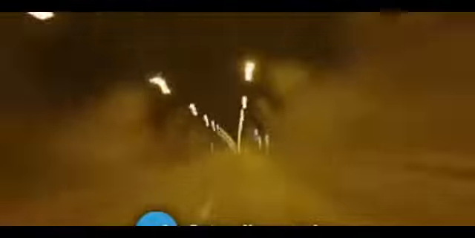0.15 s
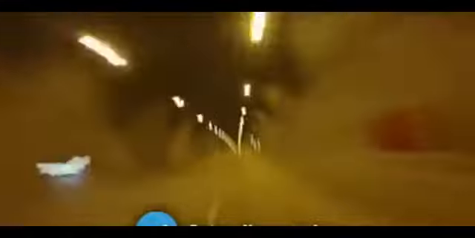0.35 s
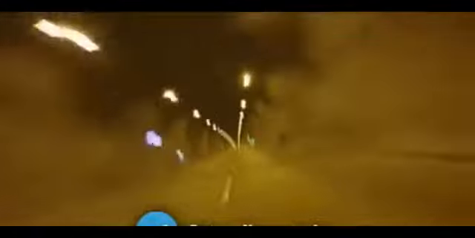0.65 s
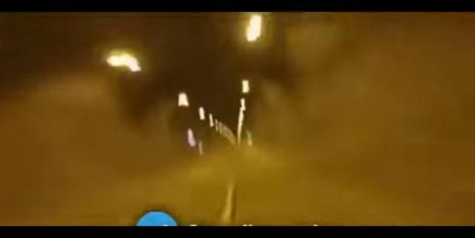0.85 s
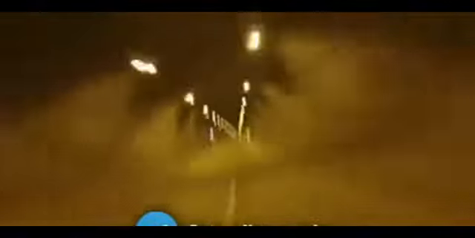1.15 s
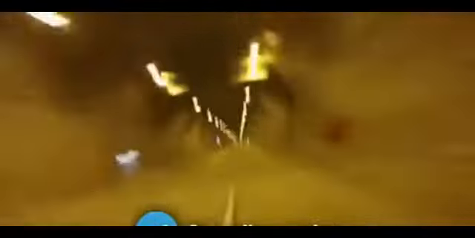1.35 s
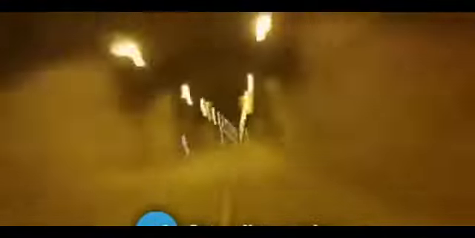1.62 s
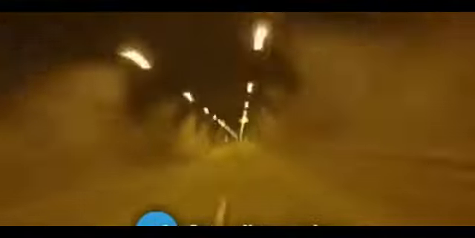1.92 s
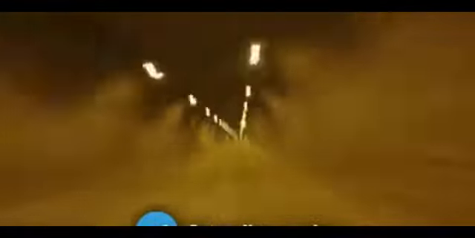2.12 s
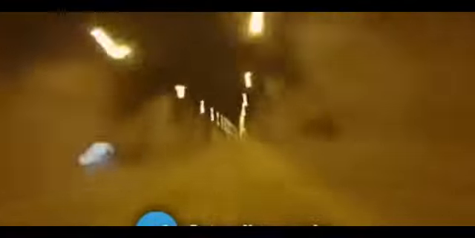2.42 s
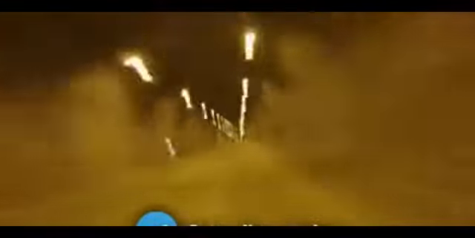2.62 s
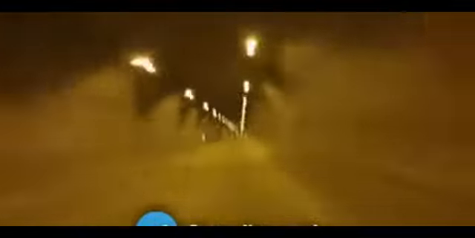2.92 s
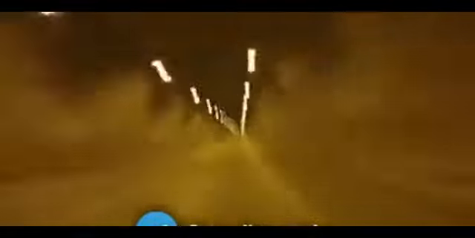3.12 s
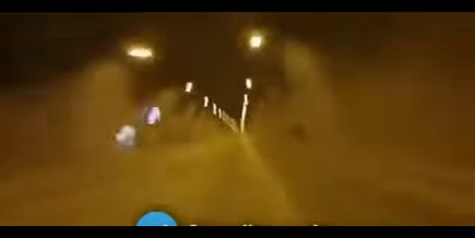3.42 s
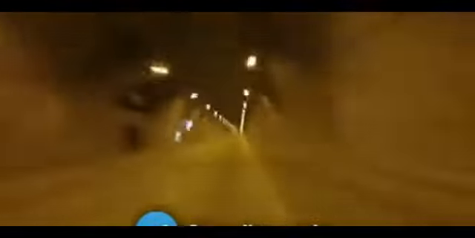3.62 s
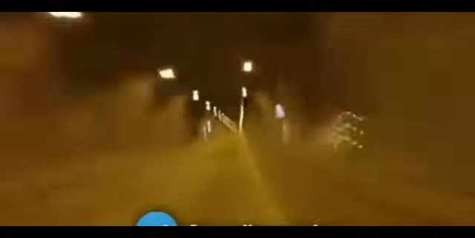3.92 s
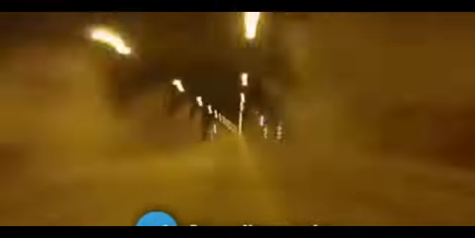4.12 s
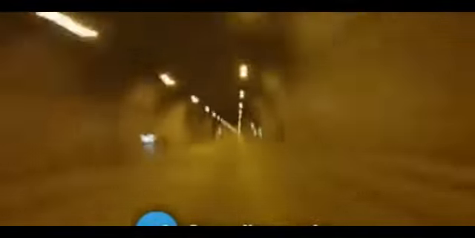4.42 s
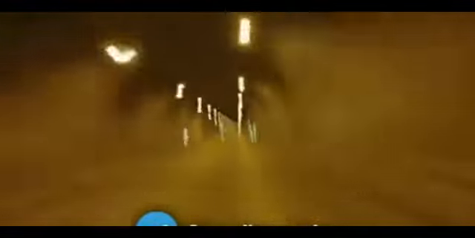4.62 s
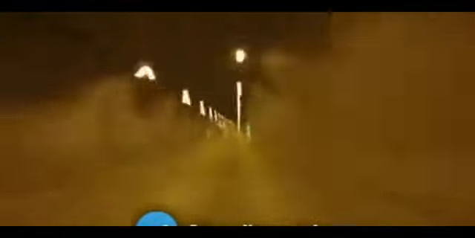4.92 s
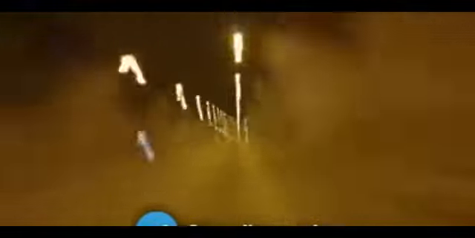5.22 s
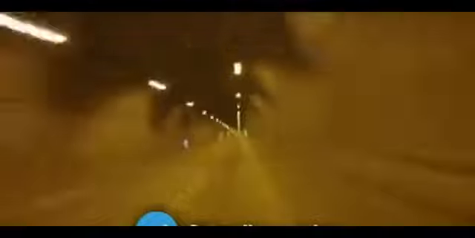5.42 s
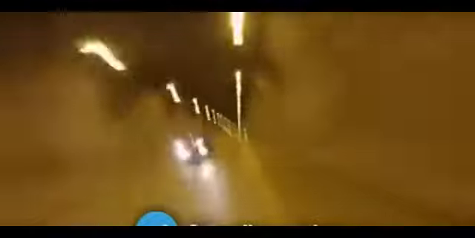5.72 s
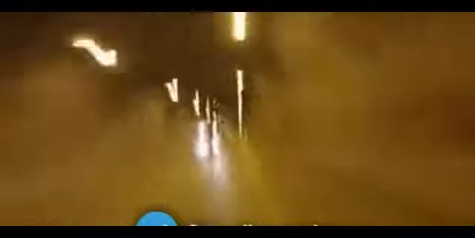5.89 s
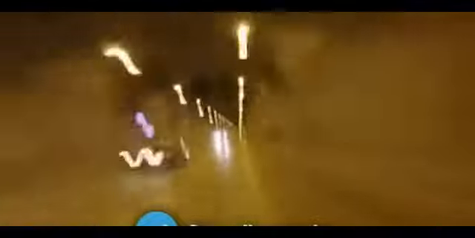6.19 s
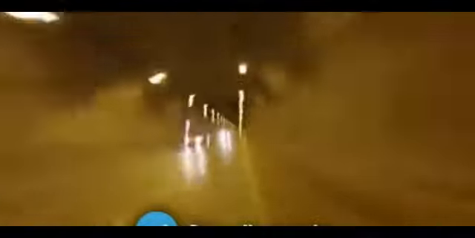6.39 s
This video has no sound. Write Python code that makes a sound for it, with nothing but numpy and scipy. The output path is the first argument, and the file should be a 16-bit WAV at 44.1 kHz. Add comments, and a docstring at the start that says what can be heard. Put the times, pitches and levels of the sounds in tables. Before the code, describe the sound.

A high-revving motorcycle engine howls through a tunnel, sinks as the rider eases off, is chopped by wind buffeting, then climbs steadily under throttle.

```python
"""A four-cylinder motorcycle at high revs in a road tunnel, heard on the bike amid wind noise.
The rider eases off and the note sinks; from about 1.6 s two spells of buffeting jitter its phase and chop it.
At 2.43 s the throttle is cracked open, which sharpens the pulses; at 2.8 s it is snapped open, and the howl,
a sum of firing harmonics, climbs through the exhaust's resonances. Weaker orders, pulsed gas noise and thin high
partials join it; decaying noise makes the tunnel's echo, shaped noise and pressure pulses the wind throughout."""
import sys
import numpy as np
from scipy import signal
from scipy.fft import rfft, irfft
from scipy.io import wavfile

SR = 44100
rng = np.random.default_rng(int(sys.argv[2]) if len(sys.argv) > 2 else 0)


def file_out(sig):
    """Save sig as 16-bit WAV at sys.argv[1]."""
    # one column per channel
    cols = np.atleast_2d(sig).T
    # limit, then scale
    lim = np.clip(cols, -1, 1)
    pcm = np.round(lim * 32767).astype(np.int16)
    wavfile.write(sys.argv[1], SR, pcm)


N = 288855
TIME = np.arange(N) / SR  # s
BINS = np.fft.rfftfreq(N, 1 / SR)  # Hz
OPEN_RISE_S = 0.022  # time that each throttle movement takes


def amp(db):
    """Level: 20 dB is a factor of ten in amplitude."""
    return 10 ** (np.asarray(db) / 20)


def evened(x):
    """Normalisation: scales a signal to rms 1."""
    return x / np.sqrt(np.mean(x ** 2) + 1e-20)


def curves(rows):
    """Linear interpolation: joins each column of a table by straight lines in time."""
    times, *columns = np.transpose(rows)
    return [np.interp(TIME, times, column) for column in columns]


def ramp(start, length):
    """Linear onset: rises from 0 to 1 and stays there."""
    return np.clip((TIME - start) / length, 0, 1)


def bump(centre, half_length):
    """Gaussian envelope: a bell of height 1 around one moment, down to 1/e at the half length."""
    return np.exp(-((TIME - centre) / half_length) ** 2)


def coloured(x, points):
    """Linear filtering: weights the spectrum by a curve on a log-frequency axis, at rms 1."""
    hz, db = np.transpose(points)
    response = amp(np.interp(np.log(BINS + 1), np.log(hz), db))
    return evened(irfft(rfft(x) * response, N))


def wander(low_hz, high_hz):
    """Band-limited random modulation: noise confined between two rates, rms 1."""
    high_pass = 1 - 1 / (1 + (BINS / low_hz) ** 2)
    low_pass = 1 / (1 + (BINS / high_hz) ** 2) ** 2
    return evened(irfft(rfft(rng.standard_normal(N)) * high_pass * low_pass, N))


def by_state(values, state):
    """Load dependence: blends values for eased off (0), pulling (1) and top revs (2)."""
    return np.interp(state, np.arange(len(values)), values)


def firing_phase(hz, state):
    """Frequency modulation: phase is the integral of the firing rate, 2 pi per firing."""
    # the crank speed shudders most under load (share of the speed, rms)
    flutter = by_state([.0022, .0034, .0026], state) * wander(8.7, 28)
    return 2 * np.pi * np.cumsum(hz * (1 + flutter)) / SR


def howl(angle, hz, throttle, skew=-2.37, waver_db=0.2969, drift_db=0.37, count=5):
    """Fourier synthesis of lopsided pulses: harmonics share a phase lag; standing waves set their levels."""
    # standing waves of the exhaust: f/Hz, relative level eased off/dB, relative level throttle open/dB
    standing_waves = [(385.5, -15, -13.5), (420, -11.5, -12.5), (443, -12.5, -10), (503, -12, -13),
                      (802, -21.5, -36), (845, -25, -22), (884, -18.5, -16), (983, -16, -13.5),
                      (1160, -23, -20.5), (1249, -21.5, -18.5), (1278, -25, -25), (1355, -32, -29.5),
                      (1385, -24, -30), (1540, -29.5, -30.5), (1730, -35.5, -29.5), (1810, -27.5, -28),
                      (1940, -35.5, -22.5), (1983, -37, -37.5), (2099, -44.5, -24.5), (2190, -28, -31.5),
                      (2285, -32, -27), (2420, -33, -34)]
    pipe_hz, eased_db, open_db = np.transpose(standing_waves)
    # cracking the throttle open lifts each harmonic above the first by a further 1.2 dB
    sharpen_db = 1.2 * ramp(2.43, OPEN_RISE_S)
    out = np.zeros(N)
    for k in range(1, count + 1):
        eased = np.interp(k * hz, pipe_hz, eased_db) + (k - 1) * sharpen_db
        opened = np.interp(k * hz, pipe_hz, open_db)
        db = (1 - throttle) * eased + throttle * opened
        # higher harmonics waver more
        db += waver_db * k * wander(2.5, 33) + drift_db * (k - 1) * wander(1, 2.3)
        out += np.sqrt(2) * amp(db) * np.cos(k * angle + skew)
    return out


def overtones(angle, hz, state, waver_db=1.7):
    """Subharmonic orders: unequal firing repeats every four firings and puts lines between the harmonics."""
    # weaker lines of the unequal cylinders and the pipe: multiple of the firing rate/1,
    # relative level eased off/dB, relative level pulling/dB, relative level at top revs/dB
    orders = [(0.25, -51.5, -37, -46), (0.5, -37, -28.5, -43.5), (0.75, -41.5, -38, -34.5),
              (1.25, -39.5, -33, -58.5), (1.5, -34.5, -29, -40), (1.75, -53, -31, -49.5),
              (2.25, -57, -33, -43), (2.5, -34.5, -31.5, -35), (2.75, -41, -31.5, -40),
              (3.25, -57, -39, -48.5), (3.5, -38, -32.5, -47.5), (3.75, -54, -36.5, -43.5),
              (4.25, -51, -37, -45), (4.5, -36.5, -36.5, -44.5), (4.75, -51.5, -36.5, -42.5),
              (5.25, -56, -42.5, -42.5), (5.5, -38.5, -29, -44), (5.75, -51.5, -42, -44),
              (6, -40.5, -35, -37.5), (6.5, -47.5, -42.5, -58.5), (7, -46.5, -58.5, -34.5),
              (7.5, -54.5, -54.5, -44.5), (8, -42.5, -37, -37.5)]
    # resonances of the exhaust that the lines slide through: f/Hz, gain/dB
    pipe = [(1700, -1.5), (2050, 0), (2270, -1.5), (2500, -0.5), (2800, -0.5), (3130, -10), (3300, 1),
            (3480, 2), (3750, -1)]
    # how unequally the cylinders fire: t/s, gain/dB
    uneven = [(0, -9.5), (.7, -2), (1.5, 2.5), (2.8, 4.5), (2.86, -2), (3.3, 1.5), (3.7, 1), (4.3, -2),
              (5.5, 0), (6.55, 1)]
    out = np.zeros(N)
    for order, *db in orders:
        pipe_db = np.interp(order * hz, *np.transpose(pipe))
        level = amp(by_state(db, state) + pipe_db + waver_db * wander(0.71, 16))
        out += np.sqrt(2) * level * np.cos(order * angle + 2 * np.pi * rng.random())
    uneven_db, = curves(uneven)
    return amp(uneven_db) * out


def cycle_buzz(angle, count=88, size=4096, crank_db=5):
    """Periodicity of the engine cycle: a fine jagged pattern repeats every four firings."""
    k = np.arange(count)  # multiples of a quarter of the firing rate
    # even lines, the multiples of the crank rate, stand out; only those above six firing rates sound
    height = amp(crank_db * (k % 2 == 0)) * (k > 24)
    shape = irfft(height * np.exp(2j * np.pi * rng.random(count)), size)
    place = angle / (8 * np.pi) % 1
    return evened(np.interp(place, np.arange(size) / size, shape))


def gas(angle, state, dip_db, depth=0.85, surge_db=0.54, sputter_db=1.44):
    """Modulated flow noise: turbulence puffs out at each firing, mixed with the buzz of the engine cycle."""
    # brief swells of the rush while the throttle is eased: t/s, half length/s, gain/dB
    swells = [(0.018, 0.051, 5.5), (.58, 0.05, 1.5), (1.103, .05, 4.5), (1.397, 0.018, 6),
              (1.767, 0.028, 8.5)]
    # spectra of the lower and upper rush: f/Hz, relative level per Hz/dB
    roar_colour = [(200, -2.5), (450, 4.5), (680, 0.5), (950, 3), (1200, 2), (1500, 0.5), (2200, -2.5),
                   (2800, -11), (3500, -7), (4300, -21.5), (6000, -40.5)]
    hiss_colour = [(1500, -32.5), (3000, -3), (3700, -10), (4500, 5), (5100, -0.5), (5800, 2.5),
                   (6500, 0.5), (7300, -4), (8500, -8)]
    # levels of the lower and upper rush before swells and dips: eased off/dB, pulling/dB, top revs/dB
    roar_levels = [-29, -24.5, -24.5]
    hiss_levels = [-41.5, -32.5, -33]
    swell_db = sum(db * bump(centre, half) for centre, half, db in swells)
    flow_db = swell_db - dip_db + surge_db * wander(1.5, 6.5)
    puffs = (1 + depth * np.cos(angle + 1.85)) * (1 + 0.36 * np.cos(angle / 2))
    # buzz levels are relative to the puffed noise
    roar = evened(puffs * rng.standard_normal(N)) + amp(by_state([-3, -2, -3], state)) * cycle_buzz(angle)
    hiss = evened(puffs * rng.standard_normal(N)) + amp(by_state([-2, -3, -4], state)) * cycle_buzz(angle)
    roar = amp(by_state(roar_levels, state)) * coloured(roar, roar_colour)
    hiss_db = by_state(hiss_levels, state) + sputter_db * wander(2.0, 25)
    return amp(flow_db) * (roar + amp(hiss_db) * coloured(hiss, hiss_colour))


def high_partials(angle, state, buffet, base_hz=3445, waver_db=2, masked_db=12):
    """Shifted harmonic series: partials one firing rate apart above a fixed base, fading in the buffeting."""
    # rungs of the ladder: firing rates above the base/1, level before fading eased off/dB, pulling/dB,
    # top revs/dB
    ladder = [(1, -42.5, -39.5, -40), (2, -44.5, -43, -38), (3, -45.5, -38, -46), (4, -49, -42.5, -45.5),
              (5, -48.5, -39, -42), (6, -50.5, -41, -46.5), (7, -63, -58, -57.5), (8, -55.5, -48.5, -48)]
    out = np.zeros(N)
    for rung, *db in ladder:
        phase = 2 * np.pi * (base_hz * TIME + rng.random()) + rung * angle
        level = amp(by_state(db, state) + waver_db * wander(0.21, 11.0))
        out += np.sqrt(2) * level * np.cos(phase)
    return out * amp(-masked_db * buffet)


def tunnel(x, t60=0.93, size=40000):
    """Reverberation: convolution with exponentially decaying noise, a long, dull wash of wall reflections."""
    t = np.arange(size) / SR
    tail = rng.standard_normal(size) * amp(-60 * t / t60) * (t > .015)  # silent for the first 15 ms
    tail = signal.lfilter(*signal.butter(1, 4000, fs=SR), tail)
    return signal.fftconvolve(x, tail / np.linalg.norm(tail))[:N]


def buffeting(release_s=0.029, dip_lead_s=.085, dip_s=0.045, least=0.047):
    """Intermittent turbulence: spells build up, hold and stop quickly; gives strength and dip of the gas in dB."""
    # start t/s, build-up/s, end t/s, strength/1, dip of the gas near the end/dB
    spells = [(1.575, 0.13, 1.98, 1, 18), (2.27, .035, 2.45, 0.86, 2.5)]
    strength, dip_db = np.zeros(N), np.zeros(N)
    for start, rise, end, top, db in spells:
        strength += top * ramp(start, rise) * (1 - ramp(end - release_s, release_s))
        dip_db += db * bump(end - dip_lead_s, dip_s)
    return np.maximum(strength, least), dip_db


def eddies(width=0.0014, gap_width=0.0063):
    """Pressure pulses: each eddy pushes the microphone and blanks the engine; gives thumps and engine gain."""
    # single eddies: t/s, peak level/dB, share of the engine note blanked/1
    hits = [(1.715, -11, 0.7), (1.768, -20, 0.7), (1.789, -16, 0), (1.811, -17, 0.5), (1.837, -6, 0.7),
            (1.866, -18, 0.8), (1.945, -7, 0.6), (2.326, -21, 0.63), (2.337, -17, 0.2), (2.391, -18, 0.7),
            (2.42, -16, 0.53), (2.553, -2.5, 0.14), (4.862, -12, .1), (4.933, -9, .1), (5.074, -5.5, 0.17),
            (5.088, -11, 0.14), (5.18, -13, 0.1), (5.335, -8, 0.1), (5.59, -15, .2)]
    thumps, gain = np.zeros(N), np.ones(N)
    for centre, db, blanked in hits:
        u = (TIME - centre) / width
        thumps += amp(db) * (1 - 2 * u ** 2) * np.exp(-u ** 2)
        gain *= 1 - blanked * bump(centre, gap_width)
    return thumps, gain


def rumble(buffet, level_db=-24):
    """Low-frequency turbulence: band-limited noise that grows with the buffeting."""
    return amp(level_db) * buffet * wander(35, 98)


def wind(buffet, steady_db=-28.5, buffet_db=-19, lumpy_db=2.5):
    """Addition of powers: steady stream, gusts and buffeting make lumpy turbulence at the microphone."""
    # gusts: t/s, half length/s, peak level/dB
    gusts = [(1.02, 0.011, -19), (1.29, 0.068, -24.5), (1.607, 0.033, -17.5), (2.156, .02, -24),
             (2.543, .015, -16.5), (2.753, 0.11, -20), (3.066, 0.034, -22), (3.45, 0.1, -26.5),
             (4.05, 0.027, -21.5), (4.413, 0.034, -24), (5.08, 0.037, -19.5), (5.18, .025, -17.5),
             (5.766, .025, -19.5), (6.042, .035, -17), (6.35, .025, -17), (6.483, .07, -18.5)]
    # spectrum of the wind noise: f/Hz, relative level per Hz/dB
    wind_colour = [(15, -15), (30, -8), (50, -3.5), (130, 1), (220, -0.5), (340, -2), (550, -2), (700, -7),
                   (1100, -9.5), (1700, -33.5), (3000, -36), (7000, -40)]
    power = amp(steady_db) ** 2 + (amp(buffet_db) * buffet) ** 2
    power += sum((amp(db) * bump(centre, half)) ** 2 for centre, half, db in gusts)
    lumps = evened(amp(lumpy_db * wander(3.2, 29)))
    return np.sqrt(power) * lumps * coloured(rng.standard_normal(N), wind_colour)


def scene(smear=0.71, chop=.55):
    """Superposition: one firing phase drives howl, rasp and gas noise, and spaces the thin high partials."""
    # engine speed: t/s, firing rate f/Hz
    revs = [(0, 467), (.42, 448.5), (.6, 439.4), (1.4, 416.5), (1.62, 414.6), (1.85, 407), (2, 400.5),
            (2.15, 397), (2.41, 395.5), (2.48, 412), (2.53, 394), (2.79, 396.5), (2.85, 402), (3.7, 420),
            (5, 447.8), (5.4, 456.5), (6, 465.5), (6.55, 475.5)]
    hz, = curves(revs)
    throttle = ramp(2.815, OPEN_RISE_S)  # snapped open
    # 0 eased off, 1 pulling, 2 at top revs
    state = throttle * np.interp(hz, [417.5, 447], [1, 2])
    buffet, dip_db = buffeting()
    thumps, blanking = eddies()
    # turbulence jitters the phase, so the upper harmonics smear into a roar, and cuts brief gaps in the note
    angle = firing_phase(hz, state) + smear * buffet * wander(26, 120)
    gaps = blanking / (1 + (chop * buffet * wander(15, 45)) ** 4)
    note = amp(0.11) * gaps * howl(angle, hz, throttle)
    rasp = overtones(angle, hz, state)
    upper = rasp + gas(angle, state, dip_db) + high_partials(angle, state, buffet)
    echo = tunnel(amp(-27.5) * note + amp(-12.5) * upper)
    return (note + blanking * upper + echo + wind(buffet) + rumble(buffet) + thumps)[None]


def record(dry, low_cut_hz=20, edge_hz=8560, ceiling=.82):
    """Soft saturation and band limiting: the microphone rounds off the loudest peaks, then both ends are cut."""
    rounded = dry / (1 + (dry / ceiling) ** 6) ** (1 / 6)
    low_cut = signal.butter(1, low_cut_hz, "high", fs=SR, output="sos")
    out = signal.sosfilt(low_cut, rounded)
    band_limit = signal.firwin(801, edge_hz, window=("kaiser", 9), fs=SR)
    return signal.oaconvolve(out, band_limit[None], "same")


dry = scene()
out = record(dry)
file_out(out)
```